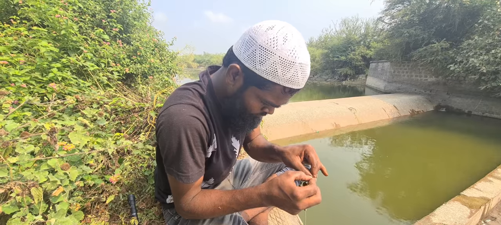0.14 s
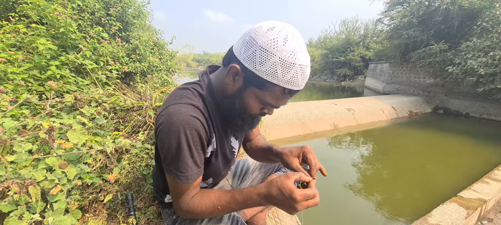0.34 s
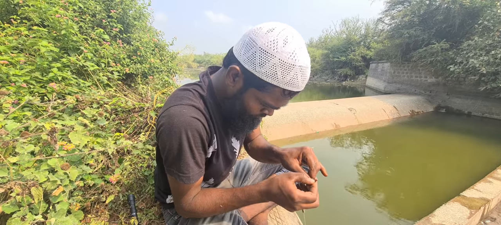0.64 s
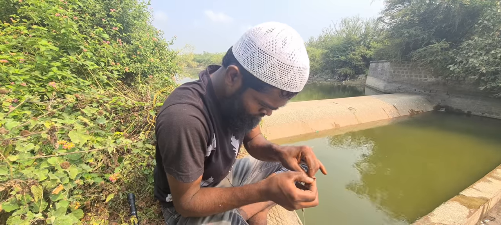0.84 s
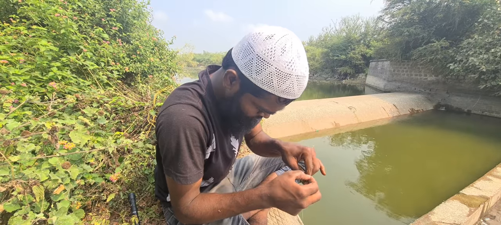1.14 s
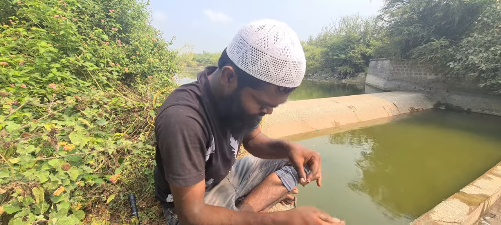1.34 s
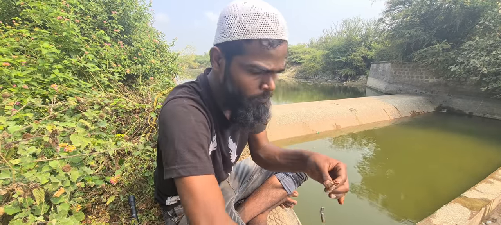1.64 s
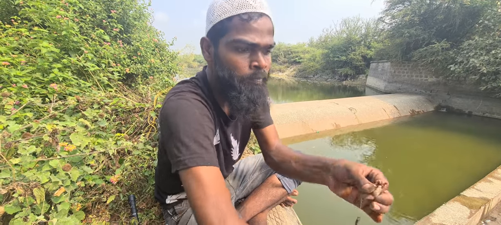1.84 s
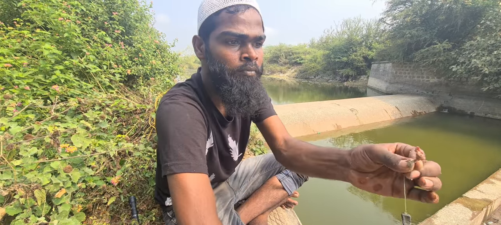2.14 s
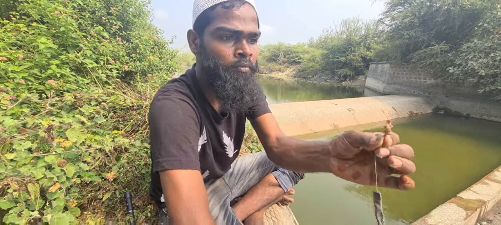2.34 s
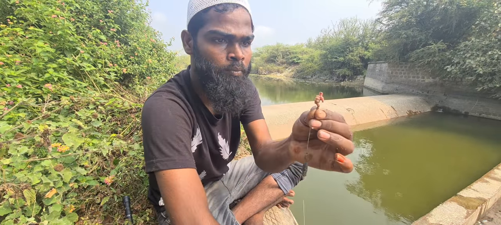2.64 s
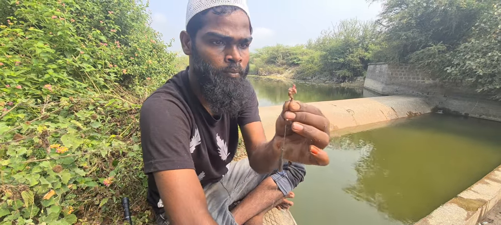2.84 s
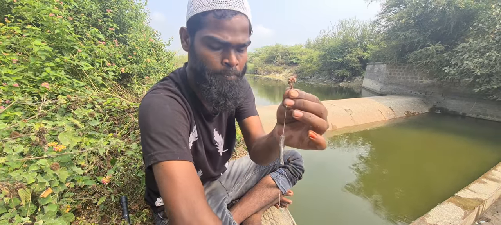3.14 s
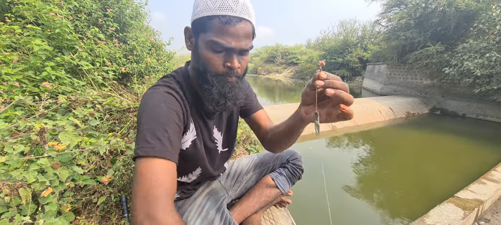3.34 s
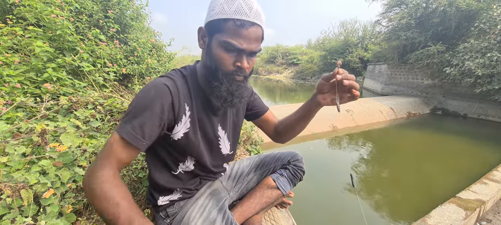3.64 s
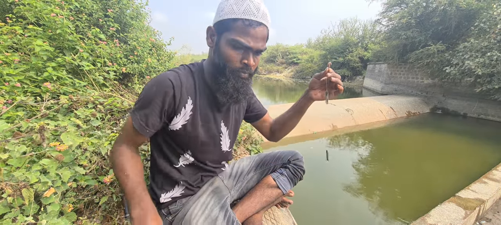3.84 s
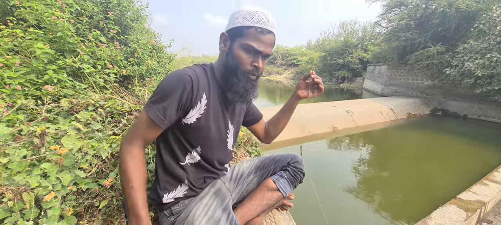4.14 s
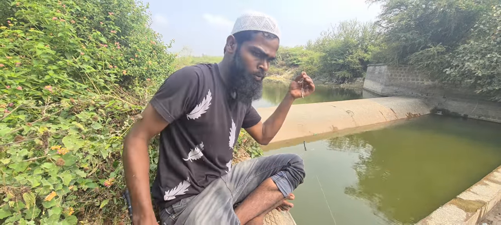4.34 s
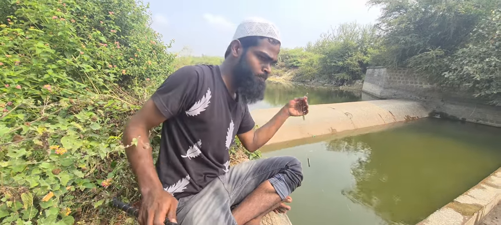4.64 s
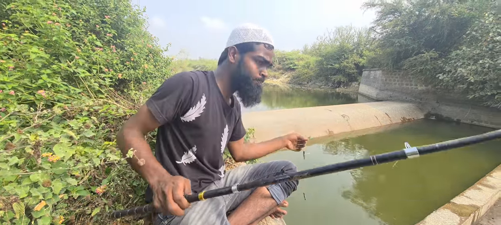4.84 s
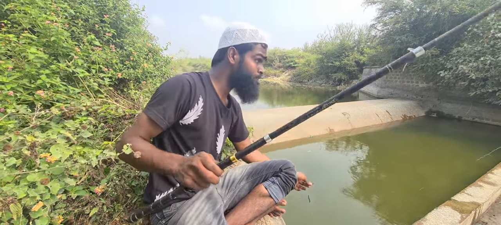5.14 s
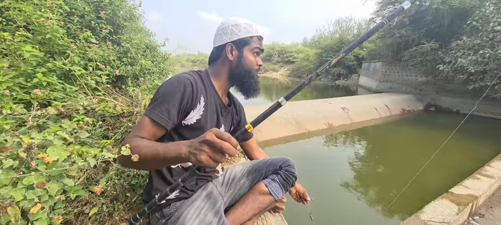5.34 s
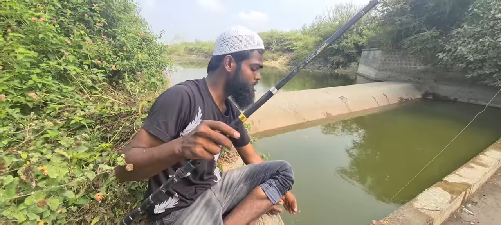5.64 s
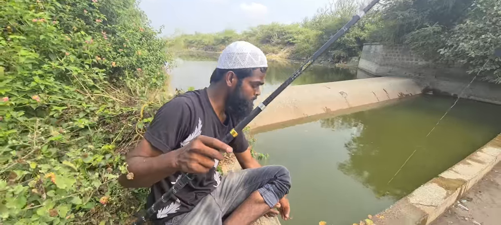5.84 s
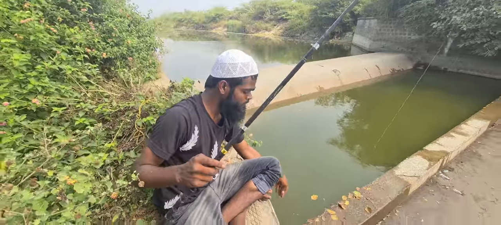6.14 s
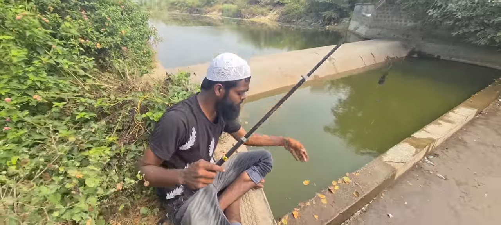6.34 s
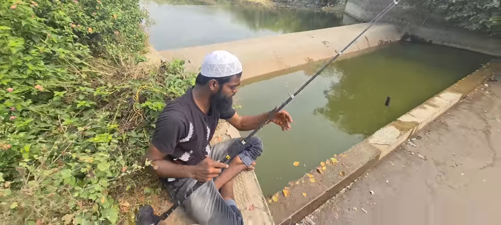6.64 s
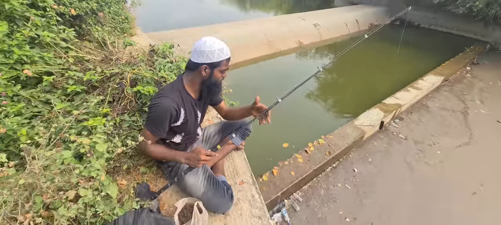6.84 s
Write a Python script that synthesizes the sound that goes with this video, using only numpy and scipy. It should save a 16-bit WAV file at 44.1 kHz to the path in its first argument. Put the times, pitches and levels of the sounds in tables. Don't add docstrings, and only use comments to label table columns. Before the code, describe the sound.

A soft, wide, low hush of distant air and water lies under everything. From 0 to 1.4 s a small bird close to the microphone sings fast, clear turned whistles, a rolled rise, high ticks and a jagged, buzzy warble around 7 kHz. Beneath it, sharp upward flicks tick about eight or nine a second, then at 1.0 s become a bright three-note trill, dense and rasping, slowing slightly until about 2.2 s, echoing briefly off leaves and wall. Then it is quieter: faint flicks, dry falling chips around 3 kHz from 3.1 to 4.1 s, two hooked calls near 4.3 and 4.4 s. A far, hazy buzz swells from 4 to 5.5 s. Slurred, broken and hoarse whistles gather from 5.2 s. From 5.9 s long steep falls grow loud, shortening to a steady beat at 6.5-6.8 s, ending on a lower note near 6.9 s.

```python
import sys
import numpy as np
from scipy import signal
from scipy.io import wavfile
from scipy.ndimage import uniform_filter1d

SR = 44100
rng = np.random.default_rng(int(sys.argv[2]) if len(sys.argv) > 2 else 0)


def gain_from_decibels(decibels):
    exponent = np.asarray(decibels, float) / 20
    return 10 ** exponent


def materialize(psi):
    bounded = np.clip(np.atleast_2d(psi).T, -1, 1)
    quanta = np.round(bounded * 32767).astype(np.int16)
    wavfile.write(sys.argv[1], SR, quanta)


N = 308259

# share of length, share of way to the second pitch, level/dB
STRIKE_SHAPE = [(0, 0.085, 1.5), (.4, 0.55, -1), (1, 0.83, -6)]
# share of length, share of way to the second pitch, level/dB
SWELL_SHAPE = [(0, 0, -12), (.5, .7, -3), (1, 1, 0)]


def rms_one(x):
    return x / np.sqrt(np.mean(x ** 2) + 1e-20)


def at_hz(points, hz):
    table_hz, value = np.array(points).T
    return np.interp(np.log(hz), np.log(table_hz), value)


def drift(rate_hz):
    r = np.exp(-2 * np.pi * rate_hz / SR)
    slow = signal.lfilter([1], [1, -2 * r, r * r], rng.standard_normal(N + SR))
    return rms_one(slow[SR:])


def add(out, note, at=0., gain_db=0., tops=None, skew=0.79, fade=.004, half_db=-60,
        gap_db=0., gap_at=0.18, gap_width=0.11, size=110, waver=0.):
    s, hz, level_db, *swing_hz = np.transpose(note)
    first = max(int((at + s[0] - fade) * SR), 0)
    last = min(int((at + s[-1] + fade) * SR), N)
    i = np.arange(first, last)
    t = i / SR - at
    pitch = np.interp(t, s, hz)
    level = np.interp(t, s, level_db) + gain_db
    if tops:
        turn = np.interp(t, tops, np.arange(len(tops))) % 1
        pitch += np.interp(t, s, swing_hz[0]) * signal.sawtooth(2 * np.pi * (turn + skew), skew)
        level += gap_db * np.exp(-((turn - gap_at) / gap_width) ** 2)
    knots = t[::130]
    wobble = np.interp(t, knots, rng.standard_normal(len(knots)))
    smooth_hz = uniform_filter1d(pitch, size=size, mode="nearest") * (1 + waver * wobble)
    phase = 2 * np.pi * np.cumsum(smooth_hz) / SR
    edge = np.clip(np.minimum(t - t[0], t[-1] - t) / (2 * fade), 0, 1)
    tone = np.sin(phase) + gain_from_decibels(half_db) * np.sin(phase / 2)
    out[i] += np.sqrt(2) * gain_from_decibels(level) * np.sin(np.pi / 2 * edge) ** 2 * tone


def phrase(notes, **how):
    out = np.zeros(N)
    for note in notes:
        add(out, note, **how)
    return out


def repeat(syllable, beats, gain_db, change=0.0053):
    out = np.zeros(N)
    bends = 1 + change * rng.standard_normal(len(beats))
    for (s, level_db, *share), bend in zip(beats, bends):
        for note in syllable:
            bent = np.array(note) * [1, bend * np.prod(share), 1]
            add(out, bent, at=s, gain_db=level_db + gain_db, fade=.002)
    return out


def shaped(shape, rows):
    return [[(s + a * length, first + b * (second - first), level_db + c) for a, b, c in shape]
            for s, length, first, second, level_db in rows]


def slowing(run, count):
    start, gap, growth = run
    k = np.arange(count)
    return start + gap * k + growth * k * (k - 1) / 2


def beats_of(curve):
    s, per_s, level_db, share = np.transpose(curve)
    t = np.arange(s[0], s[-1], 1 / SR)
    count = np.floor(np.cumsum(np.interp(t, s, per_s)) / SR)
    at = t[1:][np.diff(count) > 0]
    return np.c_[at, np.interp(at, s, level_db), np.interp(at, s, share)]


def leaves(x, flutter_db, close_db, haze_db, close_t60=0.12, haze_t60=0.7, wall_db=-60):
    t = np.arange(SR) / SR
    close, haze = rng.standard_normal((2, SR))
    close = close * gain_from_decibels(-60 * t / close_t60) * (t > .002)
    haze = haze * gain_from_decibels(-60 * t / haze_t60) * (1 - np.exp(-t / 0.015))
    echo = gain_from_decibels(close_db) * close / np.linalg.norm(close)
    echo += gain_from_decibels(haze_db) * haze / np.linalg.norm(haze)
    wall = close[100:600]
    wall_start = int(.045 * SR)
    echo[wall_start:wall_start + len(wall)] += gain_from_decibels(wall_db) * wall / np.linalg.norm(wall)
    return x * gain_from_decibels(flutter_db * drift(230)) + signal.fftconvolve(x, echo)[:N]


def air(patchy_db):
    # f/Hz, level/dB per Hz
    colour = [(20, -22), (60, -16), (120, -21.5), (190, -11), (280, -2.5), (450, -3.5), (730, -7.5),
              (1000, -8), (1600, -12), (2700, -9.5), (4000, -11.5), (7000, -12.5), (10000, -19),
              (14000, -22.5)]
    # f/Hz, correlation
    likeness = [(30, -.2), (80, -.4), (180, .64), (300, .955), (500, .93), (800, .87), (1500, .6),
                (2800, .995), (7000, .995), (12000, .985)]
    # t/s, level/dB, extra level/dB between 2 and 14 kHz
    bed_swell = [(0., -54.5, -2), (1.5, -54.5, -0.8), (2.67, -55, -5), (4., -54.5, -1.8), (5.4, -54, -0.5),
                 (5.9, -53.5, -3.5), (6.25, -52, -0.5), (6.74, -53, 1), (6.99, -52.5, -2.5)]
    s, bed_db, extra_db = np.transpose(bed_swell)
    t = np.arange(N) / SR
    level_db = np.interp(t, s, bed_db)
    upper_db = np.interp(t, s, extra_db)
    white = rng.standard_normal((2, 2, N))
    edges = 22 * 2 ** np.arange(0, 9.6, .5)
    out = 0
    for k, (low, high) in enumerate(zip(edges, edges[1:])):
        band = signal.butter(2, [low, high], "band", fs=SR, output="sos")
        mid, side = signal.sosfilt(band, white[k % 2])
        hz = np.sqrt(low * high)
        alike = np.clip(at_hz(likeness, hz), -1, 1)
        flicker_db = patchy_db * np.clip(330 / hz, 1.8, 8) * drift(12.0)
        gain = gain_from_decibels(at_hz(colour, hz) + flicker_db + upper_db * (2000 < hz < 14000))
        out = out + gain * (np.sqrt(1 + alike) * mid + np.sqrt(1 - alike) * side * [[1], [-1]])
    return rms_one(out) * gain_from_decibels(level_db + 5.5)


def far_birds():
    # t/s from the beat, f/Hz, level/dB
    far_pair = [
        [(-.008, 7800, -14), (0, 7450, -8.5), (.012, 6500, -3), (.02, 5954, -5), (.032, 5840, -6)],
        [(.036, 7000, -12), (.044, 6150, -3), (.058, 5856, -4.5)],
    ]
    # t/s from the beat, f/Hz, level/dB
    faint_flick = [
        [(0, 5750, -8), (.008, 6610, 0.5), (.016, 7900, -4)],
    ]
    # t/s, syllables per s, level/dB, pitch share
    buzz_pace = [(3.95, 17.4, -62, 0.91), (4.15, 17.4, -53, 0.93), (4.3, 15.6, -48.5, .93),
                 (4.5, 14, -45, 0.98), (4.95, 14, -42, 0.97), (5.3, 12, -42, 0.95), (5.55, 16, -48, 0.96)]
    # t/s, syllables per s, level/dB, pitch share
    faint_pace = [(2.86, 8.2, -65, 1.), (3.2, 7.2, -62, 1.), (3.6, 7.7, -60, 0.95), (4.1, 9.4, -66, 0.89)]
    song = repeat(far_pair, beats_of(buzz_pace), gain_db=-8.5, change=.014)
    song += repeat(faint_flick, beats_of(faint_pace), gain_db=-3)
    return leaves(song, flutter_db=4, close_db=10.5, haze_db=13.5, close_t60=.12)


def chipper():
    # t/s from the beat, f/Hz, level/dB
    chip = [
        [(-.021, 3580, -14), (-.013, 3370, -11), (-.007, 3480, -14)],
        [(-.004, 3520, -10), (0, 3390, -2), (.005, 3230, -2), (.01, 3060, -12)],
        [(.015, 2700, -27), (.026, 2550, -27)],
    ]
    # t/s, level/dB, pitch share
    chips = [(3.096, -47, 1.005), (3.189, -43.5, 0.99), (3.282, -42.5, 0.99), (3.379, -40.5, 0.98),
             (3.477, -40.5, 0.99), (3.573, -40, 0.98), (3.666, -34.5, 0.98), (3.771, -37.5, 0.96),
             (3.882, -39, .96), (3.994, -35.5, 0.95), (4.106, -40.5, 0.97)]
    # t/s from the beat, f/Hz, level/dB
    hook = [
        [(-.022, 2500, -30), (-.01, 2850, -22), (-.003, 3130, -9), (.004, 3340, -5), (.01, 3400, -14)],
        [(.016, 2750, -27), (.03, 2500, -28)],
    ]
    # t/s, level/dB
    hooks = [
        (4.2764, -31),
        (4.4341, -36.5),
    ]
    calls = repeat(chip, chips, gain_db=-1.5, change=0.018) + repeat(hook, hooks, gain_db=0.5)
    return leaves(calls, flutter_db=3.0, close_db=-0.5, haze_db=-4.0, close_t60=0.049)


def chatter():
    # share of length, share of way to the second pitch, level/dB
    arch = [(0, 0, 5.6), (.35, .35, 7.1), (1, 1, 2.5)]
    # t/s, length/s, first centre f/Hz, last centre f/Hz, level/dB
    bursts = [(4.79, .085, 3250, 3150, -55), (4.87, .07, 2660, 2580, -61), (5.051, .071, 2400, 3350, -53),
              (5.116, .045, 5350, 3700, -53), (5.36, .078, 3770, 3680, -55), (2.855, .115, 3100, 3300, -68),
              (.008, .04, 3200, 3550, -55), (6.39, .02, 5000, 4500, -50), (.448, .014, 5200, 5100, -44),
              (5.385, .03, 4700, 4400, -60)]
    turns_per_s, swing_hz = 68, 290
    out = np.zeros(N)
    for rows in shaped(arch, bursts):
        tops = list(rows[0][0] + np.arange(16) / turns_per_s)
        warbled = [(*point, swing_hz) for point in rows]
        out += phrase([warbled], tops=tops, skew=0.3, gap_db=-10, gap_at=.6, gap_width=.2)
    return leaves(out, flutter_db=4, close_db=-1.5, haze_db=3)


def falling_series():
    # share of length, share of way to the second pitch, level/dB
    fall_shape = [(0, 0.0044, -13.5), (.33, .48, -8.5), (.65, .89, -1), (1, 0.97, -5.5)]
    # t/s, length/s, first f/Hz, second f/Hz, level/dB
    long_falls = [
        (5.879, 0.083, 7660, 5730, -43),
        (6.031, 0.091, 8020, 5700, -31.5),
        (6.187, 0.084, 8080, 5640, -24.5),
        (6.363, 0.057, 7630, 5575, -21),
    ]
    # t/s from the beat, f/Hz, level/dB
    short_fall = [
        [(0, 5780, -4.5), (.013, 5680, -2.5), (.032, 5030, 0), (.046, 4807, -8.5)],
    ]
    # t/s, level/dB, pitch share
    short_beats = [(6.488, -21.5, 1.01), (6.587, -21, 0.99), (6.688, -22.5, 0.98), (6.788, -22, 0.96)]
    # t/s, f/Hz, level/dB
    last_fall = [
        [(6.889, 4870, -25), (6.9, 4660, -23.5), (6.915, 4500, -27), (6.928, 4460, -25), (6.938, 4620, -28)],
    ]
    falls = phrase(shaped(fall_shape, long_falls), size=260)
    falls += repeat(short_fall, short_beats, gain_db=-0.5) + phrase(last_fall)
    return leaves(falls, flutter_db=2.0, close_db=-6, haze_db=-5, wall_db=-19)


def glides():
    # t/s, f/Hz, level/dB
    slurs = [
        [(5.168, 2740, -47), (5.182, 3020, -38), (5.196, 3095, -43.5), (5.215, 2960, -45)],
        [(5.262, 4110, -46), (5.29, 2900, -42.5), (5.3, 3685, -38), (5.308, 3906, -38), (5.322, 3110, -32)],
        [(5.39, 3014, -27.5), (5.402, 2380, -41), (5.409, 1990, -46), (5.418, 2450, -44)],
        [(5.447, 2890, -26.5), (5.461, 2270, -43), (5.473, 2500, -34.5), (5.483, 2293, -48)],
        [(5.766, 3560, -38), (5.78, 3594, -34), (5.797, 3600, -38), (5.815, 3654, -32.5), (5.835, 3610, -39),
         (5.85, 3600, -33), (5.868, 3590, -53), (5.89, 3517, -29), (5.915, 3600, -47)],
        [(5.925, 3597, -35), (5.94, 3574, -43), (5.975, 3556, -36.5)],
        [(6.588, 3480, -32), (6.61, 3384, -28.5), (6.645, 3373, -38), (6.685, 3356, -28), (6.72, 3300, -35.5),
         (6.76, 3310, -41)],
        [(5.537, 2757, -33), (5.56, 2494, -31.5), (5.598, 1768, -42.5), (5.612, 1664, -45), (5.625, 1966, -41),
         (5.634, 2260, -35), (5.647, 2280, -33.5)],
        [(5.998, 3560, -36), (6.018, 3703, -35), (6.034, 3726, -38), (6.06, 3660, -39), (6.075, 3730, -54)],
        [(6.037, 3597, -26.5), (6.055, 3415, -35.5), (6.075, 3180, -43)],
        [(6.224, 2725, -38), (6.25, 2704, -27), (6.275, 2620, -31.5), (6.288, 2160, -44), (6.298, 2872, -29.5),
         (6.315, 2970, -31.5), (6.33, 2880, -47)],
        [(6.292, 2660, -46), (6.312, 2740, -44), (6.325, 2840, -46)],
    ]
    # t/s, f/Hz, level/dB
    arcs = [
        [(6.752, 3450, -42), (6.77, 3594, -32), (6.79, 3640, -34.5), (6.815, 3660, -39)],
        [(6.926, 5800, -44), (6.931, 6220, -40), (6.936, 6000, -44)],
        [(4.6, 4800, -60), (4.625, 4600, -53), (4.645, 4480, -60)],
    ]
    # t/s, f/Hz, level/dB
    hoarse = [
        [(2.905, 3900, -64), (2.93, 3950, -62), (2.98, 3940, -63), (3.02, 3940, -68)],
        [(4.43, 2014, -55), (4.455, 2420, -46), (4.485, 2820, -59)],
        [(4.495, 2856, -49), (4.54, 3000, -51), (4.58, 2960, -47.5), (4.62, 2710, -45.5), (4.658, 2428, -44.5)],
        [(4.715, 1930, -46), (4.726, 2230, -48), (4.74, 2700, -59)],
        [(4.755, 2195, -50), (4.766, 1900, -51), (4.797, 1706, -52)],
        [(5.7, 6350, -60), (5.75, 6450, -61), (5.8, 6480, -61)],
        [(5.985, 1627, -44), (5.997, 1600, -50), (6.008, 2300, -38)],
        [(6.01, 1640, -41), (6.018, 2180, -41), (6.026, 2820, -52)],
        [(6.165, 4600, -61), (6.19, 4600, -66), (6.215, 4500, -66)],
        [(6.439, 5350, -48), (6.446, 4750, -40), (6.465, 4880, -41), (6.485, 4970, -37), (6.495, 5020, -42)],
        [(6.446, 4380, -38), (6.452, 3590, -44), (6.457, 4300, -33), (6.462, 3800, -44)],
        [(6.466, 4350, -23.5), (6.474, 3220, -38), (6.482, 3900, -42)],
        [(6.487, 4110, -29), (6.497, 3060, -34.5), (6.504, 3550, -40), (6.514, 3500, -36)],
        [(6.705, 1417, -51), (6.722, 1780, -49.5), (6.745, 1910, -56), (6.8, 1960, -61), (6.83, 1900, -49),
         (6.86, 1715, -44), (6.878, 1590, -48)],
    ]
    # share of length, share of way to the second pitch, level/dB
    hold_shape = [(0, 0.019, 9.5), (.3, 0.303, 2), (1, 1, 7.5)]
    dip_shape = [(0, 0, 3.6), (.5, 0.95, 0.5), (1, .35, 2.5)]
    # t/s, length/s, first f/Hz, second f/Hz, level/dB
    strikes = [(5.978, .008, 2870, 1570, -36), (6.1, .02, 1700, 1615, -44), (6.56, 0.039, 2738, 2766, -28),
               (6.939, .028, 4360, 2970, -31.5), (6.948, .022, 2770, 1775, -31)]
    swells = [(5.721, 0.025, 4650, 3550, -38), (4, .04, 3600, 3700, -57), (6.159, 0.0079, 2200, 2050, -38),
              (6.34, 0.047, 3200, 3000, -43)]
    holds = [(4.85, .025, 1870, 1820, -60), (5.328, .008, 3000, 2900, -49), (6.6, .11, 2760, 2733, -48),
             (4.122, .018, 2500, 1780, -58), (5.734, 0.019, 3520, 3400, -37.5),
             (6.775, 0.037, 3960, 4020, -45), (6.85, .07, 3650, 3600, -55), (6.85, .1, 7900, 7400, -63)]
    dips = [(5.945, 0.0298, 2960, 2304, -35)]
    notes = slurs + arcs + shaped(STRIKE_SHAPE, strikes) + shaped(SWELL_SHAPE, swells)
    notes += shaped(hold_shape, holds) + shaped(dip_shape, dips)
    clear = phrase(notes, size=260, waver=.004, fade=.005)
    clear = leaves(clear, flutter_db=2, close_db=-7, haze_db=-4, haze_t60=.75)
    rough = phrase(hoarse, size=200, waver=.01)
    return clear + leaves(rough, flutter_db=3.5, close_db=-2, haze_db=-1, haze_t60=.6)


def whistlers():
    return glides() + falling_series() + chipper() + chatter()


def triller():
    # t/s from the beat, f/Hz, level/dB
    flick = [
        [(-.006, 4920, -24), (-.002, 5750, -9), (.002, 7030, -1.5), (.005, 8230, -10.5), (.009, 9100, -24)],
    ]
    # t/s, level/dB
    flick_beats = [(.008, -52), (.0642, -38.5), (0.195, -38), (0.3146, -37), (0.433, -38), (0.544, -37.5),
                   (0.6536, -36.5), (0.766, -36), (0.867, -31.5), (0.954, -37)]
    # t/s from the beat, f/Hz, level/dB
    triple = [
        [(-.027, 5506, -15), (-.022, 6060, -2), (-.017, 6567, -5.5), (-.009, 6770, -5.5), (-.004, 6800, -12)],
        [(-.003, 8760, -12.5), (.001, 8090, -5.5), (.005, 7430, -1.5), (.010, 6566, -3), (.014, 6500, -10)],
        [(.014, 5816, -14.5), (.022, 5780, -7), (.028, 6130, -12), (.035, 6700, -20)],
    ]
    # t/s from the beat, f/Hz, level/dB
    scoop = [
        [(-.029, 4400, -33), (-.026, 4950, -26), (-.023, 5600, -21)],
    ]
    # first t/s, first gap/s, growth of each gap/s
    trill_run = (1.016, .0611, .000615)
    flicks = repeat(flick, flick_beats, gain_db=2.5, change=0.0172)
    flicks = leaves(flicks, flutter_db=3.0, close_db=4.5, haze_db=6, close_t60=.17, wall_db=-7)
    at = slowing(trill_run, count=18)
    full_db, warmup_db, warmup_s = -26, -7.5, 0.14
    beats = np.c_[at, full_db + warmup_db * np.exp((at[0] - at) / warmup_s)]
    scoops = [(s, level_db + 20 * (s - 2.1)) for s, level_db in beats]
    trill = repeat(triple, beats, gain_db=-4.5, change=0.005) + repeat(scoop, scoops, gain_db=8.5)
    trill = leaves(trill, flutter_db=2.5, close_db=2.5, haze_db=4.5, haze_t60=0.48, wall_db=-6.5)
    effort = np.sqrt(uniform_filter1d(trill ** 2, size=2000).clip(0))
    band = signal.butter(2, [8800, 12500], "band", fs=SR, output="sos")
    hiss = signal.sosfilt(band, rng.standard_normal(N))
    rasp = gain_from_decibels(-19.5) * effort * hiss
    return trill + rasp + flicks


def warbler():
    # t/s, f/Hz, level/dB
    low_turns = [
        [(.245, 4230, -24), (.27, 4555, -23.5), (.285, 4230, -24), (.3, 3500, -22), (.312, 2570, -48)],
        [(.429, 3550, -32), (.433, 4890, -24.5), (.44, 3700, -29.5), (.452, 2450, -45), (.465, 2420, -48)],
        [(.425, 2600, -47), (.45, 2896, -41), (.478, 2670, -45)],
        [(.52, 2770, -46), (.57, 2684, -53), (.64, 2630, -61), (.7, 2714, -57), (.722, 2700, -56)],
        [(.518, 2610, -53), (.538, 3490, -28.5), (.556, 4200, -22), (.578, 4500, -19), (.596, 4960, -21.5),
         (.61, 5110, -20.5), (.62, 5250, -35), (.631, 4840, -19.5), (.641, 3320, -39)],
        [(.699, 6500, -23), (.707, 4950, -19.5), (.72, 4260, -21.5), (.738, 3500, -39), (.745, 2740, -63)],
    ]
    high_turns = [
        [(.835, 6250, -32), (.841, 6260, -35)],
        [(.841, 7350, -38), (.848, 7400, -36)],
        [(.843, 4460, -46), (.851, 6300, -33), (.862, 6550, -32.5), (.875, 6840, -30), (.9, 6880, -31),
         (.908, 6740, -40)],
        [(.864, 8900, -44), (.88, 8800, -40), (.902, 8960, -31), (.91, 8400, -43), (.916, 6950, -46)],
        [(.93, 4650, -27), (.934, 7620, -28), (.94, 8700, -27.5), (.947, 8760, -32.5), (.955, 8000, -29),
         (.965, 6400, -24.5), (.985, 5180, -26.5)],
        [(1.034, 6700, -31), (1.041, 7200, -23)],
        [(1.041, 5900, -36), (1.046, 7960, -28), (1.053, 8900, -35), (1.064, 9350, -42)],
    ]
    # t/s, length/s, first f/Hz, second f/Hz, level/dB
    near_strikes = [(.688, 0.0038, 6600, 3370, -22.5)]
    near_swells = [(.044, .029, 2270, 2560, -42), (.503, 0.018, 2400, 5500, -28.5),
                   (.461, 0.0109, 5500, 3430, -23.5)]
    # t/s, f/Hz, level/dB
    lead_in = [(1.075, 9200, -26), (1.082, 6750, -22), (1.092, 8250, -30), (1.098, 7700, -27),
               (1.105, 7800, -25), (1.113, 7330, -23), (1.126, 7450, -26), (1.134, 7100, -22),
               (1.143, 6660, -27)]
    # t/s, centre f/Hz, level/dB, swing/Hz
    roll = [(.077, 2776, -35.5, 130), (.105, 2784, -38.5, 330), (.15, 3425, -30.5, 482),
            (.2, 3490, -28.5, 463), (.225, 3960, -24, 292), (.248, 4470, -25, 115.6)]
    buzz = [(1.143, 7110, -26.5, 400), (1.2, 7040, -25, 480), (1.24, 7000, -27, 480),
            (1.27, 6800, -28.5, 746), (1.33, 6750, -29.5, 800), (1.38, 6790, -30, 750),
            (1.425, 6980, -29, 550)]
    # first t/s, first gap/s, growth of each gap/s
    roll_run = (.0752, .0074, .00035)
    buzz_run = (1.141, .0195, .00036)
    plain = shaped(STRIKE_SHAPE, near_strikes) + shaped(SWELL_SHAPE, near_swells)
    song = phrase(low_turns + high_turns + plain)
    song += phrase([lead_in], half_db=-30.5)
    roll_tops = list(slowing(roll_run, count=18))
    song += phrase([roll], tops=roll_tops, skew=0.5, gap_db=-10, gap_at=.55, gap_width=.22, waver=.005)
    buzz_tops = list(slowing(buzz_run, count=15))
    song += phrase([buzz], tops=buzz_tops, skew=0.81, half_db=-37.0, gap_db=-12, waver=.026)
    return leaves(song, flutter_db=1.3, close_db=-13, haze_db=-16.5, haze_t60=.33, wall_db=-20)


def scene():
    birds = far_birds() + whistlers() + triller() + warbler()
    side = gain_from_decibels(-35) * np.roll(birds, shift=40) * [[1], [-1]]
    return air(patchy_db=.65) + birds + side


def roll_off(x):
    return signal.sosfilt(signal.butter(12, 15280, fs=SR, output="sos"), x)


def record(dry):
    quiet_edge_hz, loud_edge_hz = 14400, 12900
    hz, s, z = signal.stft(dry, SR, nperseg=1024)
    power_db = 10 * np.log10(uniform_filter1d(dry[0] ** 2, size=9000) + 1e-12)
    loud_db = np.interp(s, np.arange(N) / SR, power_db)
    loud = np.clip((loud_db + 45.5) / 14, 0, 1)
    edge_hz = quiet_edge_hz + (loud_edge_hz - quiet_edge_hz) * loud ** 2
    patch = rng.logistic(size=(len(hz) // 6 + 1, len(s) // 3 + 1))
    patch = patch.repeat(6, axis=0).repeat(3, axis=1)[:len(hz), :len(s)]
    ragged_hz = edge_hz + (120 + 330 * loud) * patch
    kept = z * (hz[:, None] < np.minimum(ragged_hz, quiet_edge_hz))
    mix = signal.istft(kept, SR, nperseg=1024)[1][:, :N]
    return roll_off(mix)


dry = scene()
out = record(dry)
materialize(out)
```